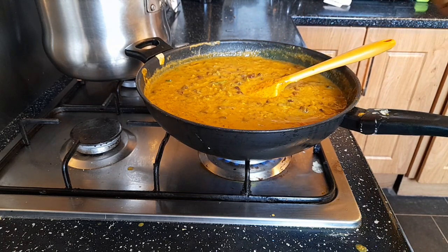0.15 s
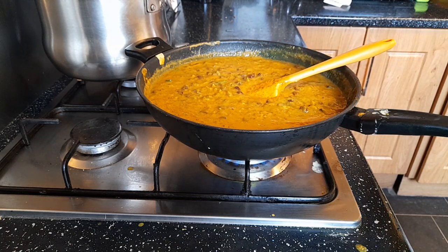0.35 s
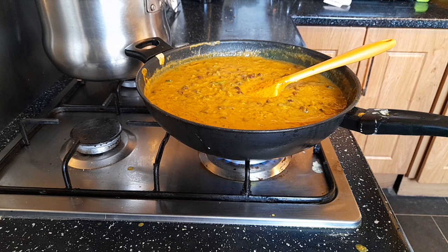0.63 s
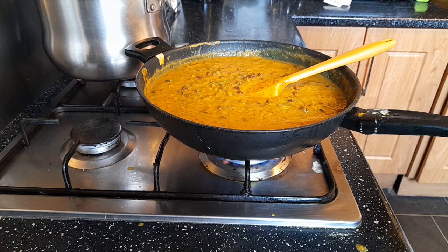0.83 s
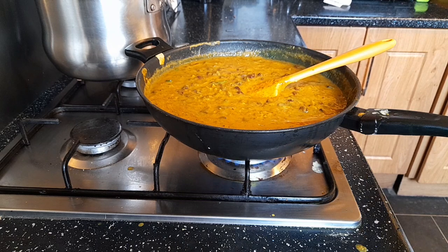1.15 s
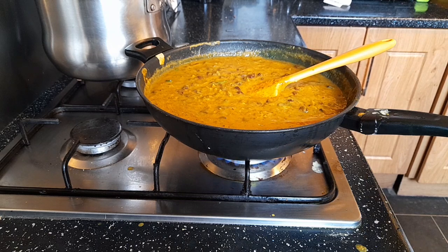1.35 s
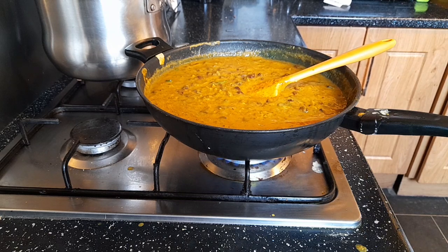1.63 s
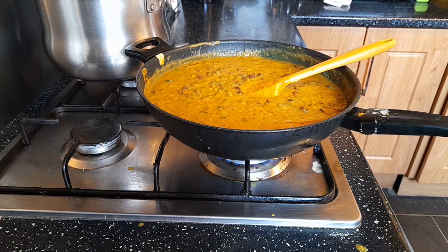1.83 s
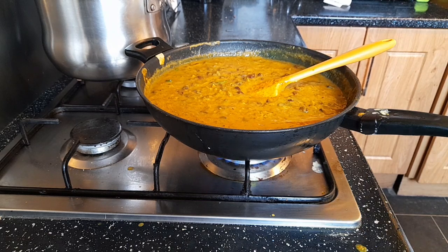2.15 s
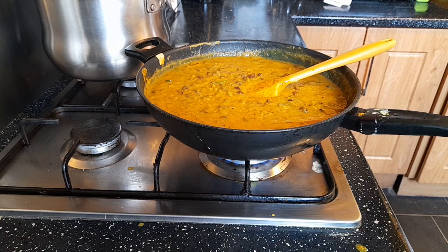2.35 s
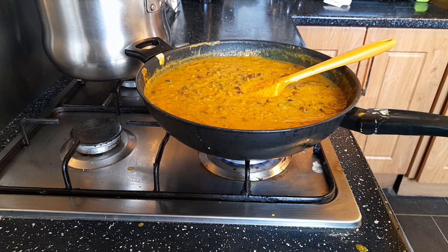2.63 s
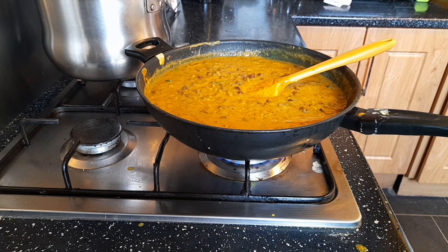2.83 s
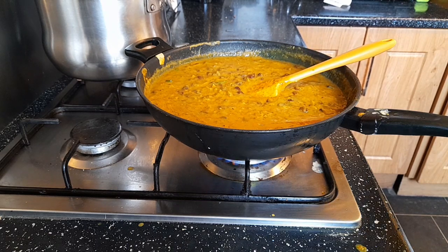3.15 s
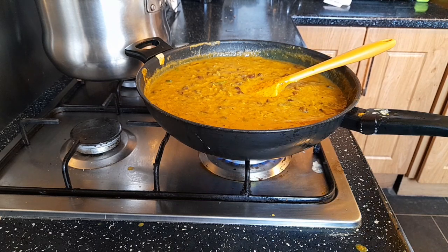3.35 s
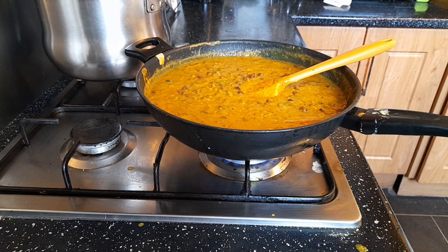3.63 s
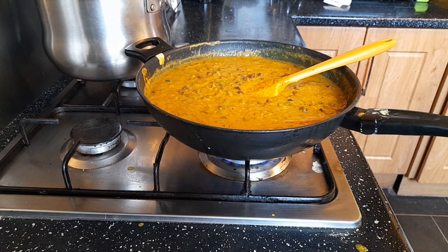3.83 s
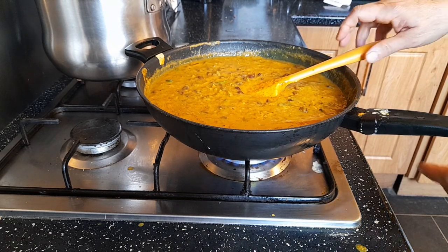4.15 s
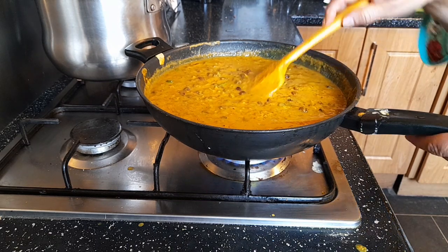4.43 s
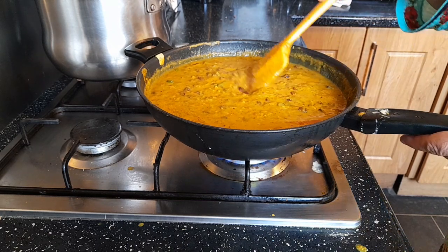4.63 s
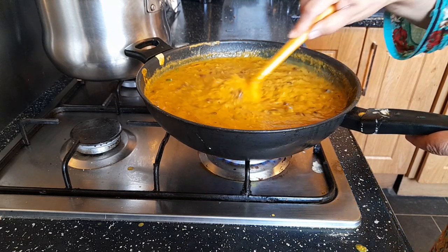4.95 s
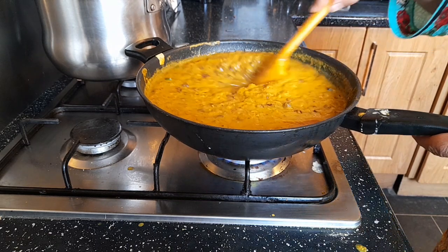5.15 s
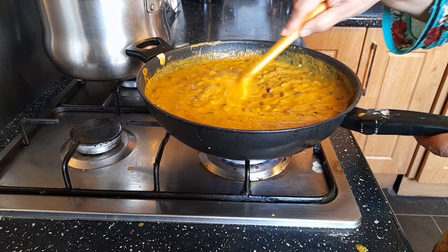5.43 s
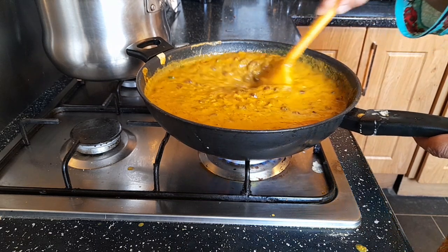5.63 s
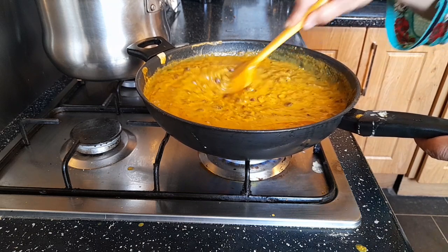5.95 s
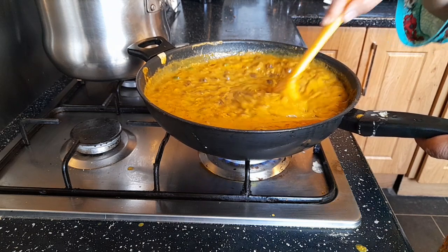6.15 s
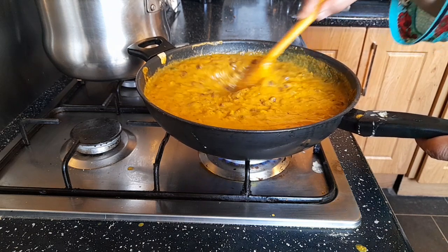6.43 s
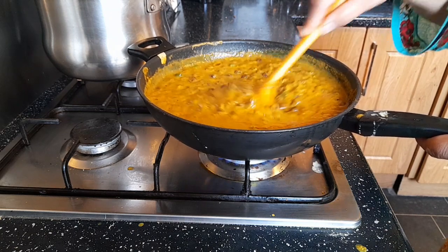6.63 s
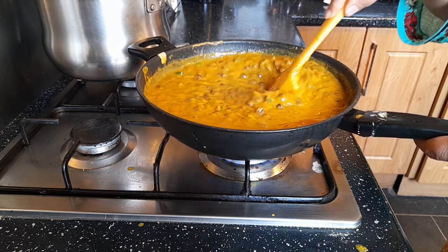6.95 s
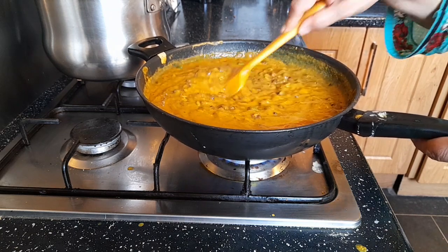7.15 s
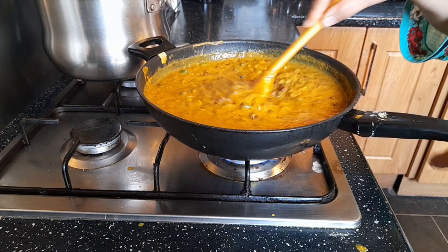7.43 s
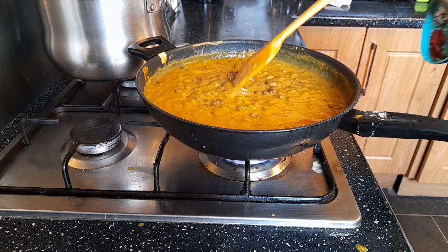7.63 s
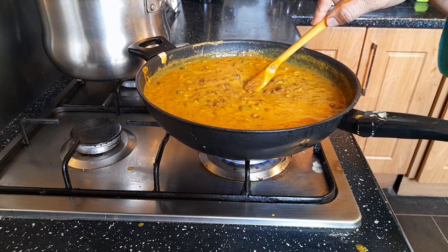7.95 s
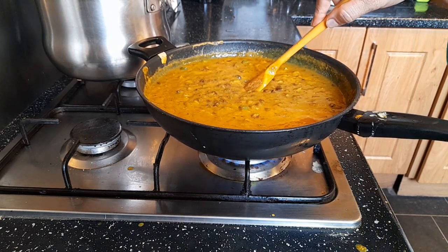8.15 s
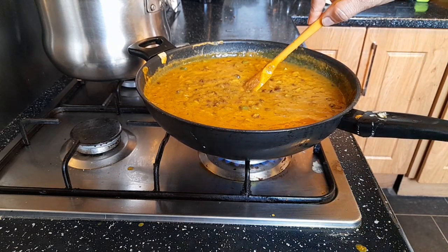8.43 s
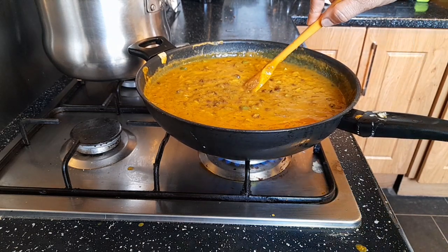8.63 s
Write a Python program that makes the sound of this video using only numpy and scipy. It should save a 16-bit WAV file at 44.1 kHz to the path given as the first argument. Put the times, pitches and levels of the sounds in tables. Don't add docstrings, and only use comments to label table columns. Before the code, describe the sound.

Close stereo pickup in a small, hard-walled kitchen: faint airy gas hiss, uneven flame rumble and small crackling bubble pops from simmering paste. A sudden very loud metallic clatter follows about a third of the way through, several rapid bounces with a knock underneath and a short ring. The background dips afterwards and gradually returns, with somewhat busier soft pops and low plops to the end as the paste is stirred.

```python
import sys
import numpy as np
from scipy import signal
from scipy.fft import rfft, irfft
from scipy.io import wavfile
from scipy.ndimage import uniform_filter1d

SR = 44100
rng = np.random.default_rng(int(sys.argv[2]) if len(sys.argv) > 2 else 0)


def level_to_linear(level):
    exponent = np.asarray(level, float) / 20
    return 10 ** exponent


def transcribe(u):
    v = np.clip(np.atleast_2d(u).T, -1, 1)
    q = np.round(v * 32767).astype(np.int16)
    wavfile.write(sys.argv[1], SR, q)


N = 387638
HALVES = np.array([[.5], [-.5]])

# (t/s, peak level/dB, brightness/dB, left-right/dB)
SITTING_BURSTS = [(0.138, -60, -1, 0), (0.237, -60, 6, -2), (0.342, -60, 5, -1), (0.75, -60, 4, .5),
                  (0.905, -53.5, 2, 1.5), (1.26, -58, -2, .5), (1.3, -50.5, -5, 1), (1.405, -61, 8, -.5),
                  (1.541, -55.5, -2, -.5), (1.743, -53, -3, -1), (1.875, -53, -7, -2.5),
                  (2.073, -63.5, 10, -9), (2.15, -47, -2.5, -6), (2.307, -53, 1, 0), (2.615, -46.5, -11, 5),
                  (3.173, -62, -2, -.5), (3.531, -58, 8.5, -7), (3.948, -50, -10, 5), (4.128, -58, 2, -1.5)]
# (t/s, peak level/dB, brightness/dB, left-right/dB)
STIRRED_BURSTS = [(4.309, -50.5, 1, .5), (4.417, -49, -8, .5), (4.54, -54.5, -4, 4), (4.673, -53.5, -6, -1),
                  (5.146, -58, 6.5, -3), (5.422, -55, 2, .5), (5.6, -60, -3, 0), (5.74, -50, -8, .5),
                  (5.959, -59, -3, -2), (6.273, -59, -3, 0), (6.323, -60, 4, 0), (6.487, -52.5, 3.7, .5),
                  (6.727, -59, -1, -2), (6.781, -54.5, 11, -.5), (6.956, -57, -1, 1), (7.274, -68, 10.5, 4),
                  (7.404, -46.5, -12, -3), (7.427, -47.5, 1, -1), (7.676, -51.5, .1, -8),
                  (7.821, -55, -5, -.5), (7.967, -51, -1.5, 2), (8.142, -54, 6, .5), (8.239, -58, 2, -1),
                  (8.463, -63, .1, 2), (8.495, -53.5, .5, 7)]


def film_bursts():
    out, t = np.zeros((2, N)), np.arange(3000) / SR
    bursts = SITTING_BURSTS + STIRRED_BURSTS
    droplet_draws = rng.random((len(bursts), 2, len(t)))
    snap_t = t[:90]
    dull = np.sin(2 * np.pi * 2300 * snap_t) * np.exp(-snap_t / 0.00016)
    bright = np.sin(2 * np.pi * 4200 * snap_t) * np.exp(-snap_t / 0.00029)
    for (s, db, bright_db, pan_db), (chance, sign) in zip(bursts, droplet_draws):
        spatter_s = max(.012 - .0004 * bright_db, .001)
        drops = (chance < .07) * (sign - .5) * 2.02 * np.exp(-t / spatter_s)
        drops[0] = 1.3
        snap = 0.69 * dull + level_to_linear(bright_db) * bright
        burst = np.convolve(drops, snap)[:len(t)]
        add(out, s, level_to_linear(db + 4.5) * burst * panned(pan_db))
    return out


# (t/s, peak level/dB, f/Hz, T60/s)
CAVITIES = [(0.03, -53, 340, 0.06), (0.27, -54, 320, 0.05), (0.379, -58, 740, 0.046),
            (0.698, -57, 696, 0.05), (1.829, -56, 650, 0.072), (1.935, -55, 706, 0.045),
            (2.151, -59, 554, 0.05), (2.295, -53, 659, 0.045), (2.339, -59, 630, 0.05),
            (3.251, -53, 400, 0.05), (3.383, -40, 370, 0.041), (3.443, -41, 385, 0.05),
            (3.505, -46, 520, 0.035), (4.308, -54, 745, 0.05), (5.084, -60, 660, 0.061),
            (5.719, -55, 316, 0.039), (5.917, -53, 380, 0.05), (6.139, -55.5, 366, 0.06),
            (6.486, -44, 520, 0.02), (6.495, -50, 760, 0.04), (6.968, -51, 600, 0.028),
            (6.975, -50, 240, 0.05), (7.03, -52, 370, 0.044), (7.193, -63, 991, 0.05),
            (7.312, -54, 708, 0.046), (7.416, -52.5, 670, 0.045), (7.675, -53, 746, 0.055),
            (8.298, -56, 657, 0.05)]


def cavity_tones():
    out, t = np.zeros((2, N)), np.arange(5000) / SR
    slap = 1.3 * np.sin(2 * np.pi * 600 * t) * np.exp(-t / .0015)
    onset = np.minimum(t / 0.0014, 1)
    for s, db, hz, t60 in CAVITIES:
        tone = np.sin(2 * np.pi * hz * t * (1 + 4 * t)) * level_to_linear(-60 * t / t60)
        add(out, s, level_to_linear(db - 2.0) * np.tile((tone + slap) * onset, (2, 1)))
    return out


# (f/Hz, level/dB, T60/s, left-right/dB)
SPOON_MODES = [(2267, -17.5, 0.32, -9), (2415, -21.5, 0.25, 3), (2600, -21, 0.2, -4),
               (3252, -16.5, 0.25, -3), (3300, -9, 0.23, -5), (3354, -14.5, 0.3, -6), (3683, -17, 0.2, -3),
               (3915, -5, 0.33, -4), (4246, -8, 0.25, -9), (4321, -0.5, 0.19, -11), (4375, -13, 0.2, -6),
               (5229, -16, 0.25, -4), (5346, -5, 0.24, -11), (5425, -1, 0.25, -1), (5846, -17, 0.25, -5),
               (6002, -21, 0.25, 4), (6617, -14, 0.25, -3), (7515, -20, 0.25, 4), (7744, -24, 0.25, 1),
               (8602, -21, 0.25, 0), (9088, -23, 0.25, 11), (9437, -16, 0.25, -1), (9667, -20, 0.2, -6),
               (9956, -16, 0.25, -1), (10002, -18, 0.25, 0), (11142, -11, 0.15, 11), (12898, -19, 0.25, 4),
               (13121, -4, 0.18, -2), (13646, -17, 0.25, 9), (15148, -22, 0.25, 5)]


def spoon_ring(t, spot, tilt_db, side_db):
    hz, db, t60, mode_side_db = np.transpose(SPOON_MODES)[:, :, None]
    mix, phase, detune = spot
    gain_db = db + tilt_db * np.log2(hz / 4500) + 5 * (mix - .5) + HALVES[:, :, None] * mode_side_db
    decay_db = -60 * t / np.clip(0.96 * t60, .02, .34)
    turns = hz * (1 + 0.0027 * (detune[0] - .5)) * t + phase
    ring = (level_to_linear(gain_db + decay_db) * np.sin(2 * np.pi * turns)).sum(1)
    contact = level_to_linear(3.0 + panned_db(-6.1)) * np.exp(-t / 0.0069)
    return ring * (.5 + contact)


# (f/Hz, level per Hz/dB)
SCRAPE_SPECTRUM = [(1700, -39), (2400, -13), (3000, -26), (4300, -17), (4850, -24), (5450, -8), (7100, -24),
                   (8200, -42), (9700, -9), (11300, -27), (12200, -38), (13000, -13), (14200, -34),
                   (15000, -10)]


def spoon_rattle(t, noise):
    decay = level_to_linear(-11) * np.exp(-t / 0.003) + level_to_linear(-5.0) * np.exp(-t / 0.03)
    return tinted(noise, SCRAPE_SPECTRUM) * decay


# (f/Hz, level per Hz/dB)
WORKTOP_SPECTRUM = [(41, -36.5), (70, -12), (105, 3), (152, -17), (218, -1.5), (300, -16), (400, -4),
                    (520, -9), (659, -10), (971, -18), (1340, -7.5), (1700, -47.5), (2210, -63.5),
                    (3740, -120)]


def worktop_thud(t, noise):
    thud = tinted(noise[0] + 0.15 * noise, WORKTOP_SPECTRUM)
    return level_to_linear(-15.5) * thud * np.exp(-t / 0.019) * np.minimum(t / 0.0022, 1)


# (t/s, blow level/dB, brightness per octave/dB, left-right/dB)
SPOON_BLOWS = [
    (3.3236, -6, 2, -2),
    (3.3365, -8, -1.5, -3.5),
    (3.3555, -13, 2.5, 2),
    (3.3635, -13.5, -8.5, 1.5),
    (3.378, -14.5, -5, -3.5),
    (3.4365, -22, -3, 3),
    (3.4999, -34, -14, 5.2),
]


def clatter():
    out, t = np.zeros((2, N)), np.arange(12000) / SR
    spots = rng.random((len(SPOON_BLOWS), 3, 2, len(SPOON_MODES), 1))
    grit = rng.standard_normal((len(SPOON_BLOWS), 2, len(t)))
    rest_s, rest_db = 3.387, -6
    onset = np.minimum(t / 0.0004, 1)
    for (s, blow_db, tilt_db, pan_db), spot, noise in zip(SPOON_BLOWS, spots, grit):
        spoon = spoon_ring(t, spot, tilt_db, pan_db) + spoon_rattle(t, noise)
        damped = level_to_linear(rest_db * np.clip((s + t - rest_s) / .006, 0, 1))
        struck = spoon * damped * panned(pan_db)
        add(out, s, level_to_linear(blow_db - 12.5) * (struck * onset + worktop_thud(t, noise)))
    return out


# (f/Hz, width/Hz, left level/dB, right level/dB)
JET_MODES = [(3500, 530, -5.5, -6.5), (4300, 400, -0.5, 0), (5295, 200, 5.5, 3), (5680, 310, -5.5, -8.5),
             (6090, 220, -9, -9), (6600, 230, -4.5, -16), (7062, 206, 6.5, 7.5), (7390, 620, -0.5, -2),
             (7730, 200, -12, 1), (7620, 250, -10, -5), (8400, 200, -22, -10), (8910, 250, 1.5, -1.5),
             (9400, 970, -0.5, -8), (10220, 560, 8.5, -1.5), (11200, 250, -7.5, 0), (11670, 270, 13, 2),
             (12170, 650, 11, 5), (12630, 200, 16, 4.5), (13050, 390, 11, 4), (13550, 300, 8, 0.5),
             (14250, 1500, 5.5, 2), (15400, 600, -4, 4.5)]
# (f/Hz, level/dB)
JET_BED_SPECTRUM = [(1500, -13), (2200, -23.5), (3000, -15.5), (5000, -7), (6400, -19), (8200, -12),
                    (11000, -11.5), (15000, -20.5)]
# (t/s, left-right level of the jet/dB)
JET_TURN = [
    (0, -1),
    (7.75, -0.4),
    (8.27, -2),
    (8.79, -4),
]


def gas_jet():
    def colour(hz):
        return np.hypot(humps(JET_MODES, hz, 1.9), level_to_linear(read(JET_BED_SPECTRUM, hz)))

    hiss = airy(colour, size=2048, patchy_db=1.9, flicker_db=0.6)
    turn_db = np.interp(np.arange(N) / SR, *np.transpose(JET_TURN))
    return level_to_linear(-48.6 - 3.6 * held_down()) * hiss * panned(turn_db)


# (f/Hz, width/Hz, left level/dB, right level/dB)
SIMMER_MODES = [(670, 190, -3, -2.5), (943, 460, -1.5, -3), (1330, 220, 1.5, 4), (1457, 200, -3, 3),
                (1690, 150, -6.5, -18.5)]


def simmer_roar():
    roar = airy(lambda hz: humps(SIMMER_MODES, hz, 1.68), size=2048, patchy_db=1.3, flicker_db=1.1)
    return level_to_linear(-60.4 - 4.2 * held_down()) * roar


# (f/Hz, width/Hz, left level/dB, right level/dB)
RUMBLE_MODES = [(66, 19, -4, -4), (101.1, 11, 2, -1), (117.6, 16, 0.5, 0.5), (185, 82, -9, -12),
                (221.2, 25, -1, -6), (262, 57, -17, -9.5), (368, 68, -19, -14)]


def flame_rumble():
    deep = airy(lambda hz: humps(RUMBLE_MODES[:3], hz, 1.3), size=4096, patchy_db=-0.75, flicker_db=1.2)
    upper = airy(lambda hz: humps(RUMBLE_MODES[3:], hz, 1.66), size=2048, patchy_db=1.7, flicker_db=-0.5)
    boom = signal.sosfiltfilt(signal.butter(4, 290, fs=SR, output="sos"), upper)
    steady = level_to_linear(-65.5) * (upper - boom)
    deep_gain, upper_gain = flare_gains()
    return level_to_linear(-0.5 - 4.5 * held_down()) * (deep_gain * deep + upper_gain * boom + steady)


# (middle t/s, level/dB, length/s, upper over deep rumble/dB)
DRAUGHTS = [(0.15, -61, .3, -2), (0.56, -58, .2, 0), (0.74, -60, .16, -3), (1.1, -57, .26, -8),
            (1.42, -59, .24, -4), (1.68, -54, .2, -8), (1.9, -59, .1, -3), (2.24, -56, .26, -9),
            (2.45, -59, .26, -4), (2.82, -53, .3, -8), (3.02, -58.5, .12, -5), (3.19, -56, .14, -8),
            (4.47, -56, .22, -7), (4.72, -56, .2, -3), (4.92, -61, .14, 7.5), (5.16, -56, .16, -7),
            (5.39, -64, .2, 6), (5.65, -57, .26, -7), (5.87, -63, .16, 7), (6.04, -55.5, .18, -7),
            (6.24, -59, .12, 1), (6.38, -57, .12, -11), (6.64, -59, .16, 2), (6.92, -55.5, .4, -5),
            (7.57, -57, .24, -6), (7.84, -60, .2, -2), (8.05, -58, .3, -5), (8.26, -57, .22, -8),
            (8.58, -59, .18, -5), (8.78, -61, .14, -5)]


def flare_gains():
    calm_db = -65
    t = np.arange(0, N / SR + .01, .005)
    s, db, length, upper_db = np.transpose(DRAUGHTS)[:, :, None]
    swell = level_to_linear(2 * db) * np.exp(-(2.4 * (t - s) / length) ** 2)
    deep = swell.sum(0) + level_to_linear(2 * calm_db)
    upper = (swell * level_to_linear(2 * upper_db)).sum(0) + level_to_linear(2 * (calm_db - 2.5))
    return [np.interp(np.arange(N) / SR, t, np.sqrt(power)) for power in (deep, upper)]


def held_down():
    drop_s, hold_s, release_s, creep = .15, 1.28, .26, .3
    t = np.arange(N) / SR - SPOON_BLOWS[0][0]
    drop = np.clip(t / drop_s, 0, 1)
    creeping = 1 - creep * np.clip(t / hold_s, 0, 1)
    release = np.clip(1 - (t - hold_s) / release_s, 0, 1)
    return drop * creeping * release


# (f/Hz, coherence 0-1)
COHERENCE = [(60, .96), (160, .92), (300, .7), (700, .55), (1100, .3), (3000, .2), (7000, .35), (15000, .3)]
# (f/Hz, phase/rad)
PHASE_LEAD = [(60, 0), (300, .05), (800, .5), (1500, 2.2), (5000, .3), (9000, 1.6), (15000, 1.2)]


def airy(colour, size, patchy_db, flicker_db):
    frames, hz = 4 * N // size + 5, np.fft.rfftfreq(size, 1 / SR)
    a, b, c, d, patches = rng.standard_normal((frames, len(hz), 5)).T
    patches = uniform_filter1d(uniform_filter1d(patches, size=9, axis=0), size=7, axis=1)
    flicker = evened(uniform_filter1d(rng.standard_normal(frames), size=3))
    drift = level_to_linear(patchy_db * evened(patches) + flicker_db * flicker)
    ripple = level_to_linear(2.9 * rng.standard_normal((len(hz), 2)).T * np.minimum(hz / 700, 1))
    same = np.clip(read(COHERENCE, hz), 0, 1)[:, None]
    lag = np.exp(-1j * read(PHASE_LEAD, hz))[:, None]
    left = a + 1j * b
    right = same * left * lag + np.sqrt(1 - same ** 2) * (c + 1j * d)
    z = np.array([left, right]) * (ripple * colour(hz))[:, :, None] * drift
    return evened(signal.istft(z, nperseg=size, noverlap=3 * size // 4)[1][:, :N])


# (f/Hz, T60/s)
KITCHEN_DECAY = [(200, 0.38), (600, 0.14), (1500, 0.62), (4000, 0.32), (10000, 0.36), (15000, .24)]


def kitchen(x):
    length, spacing = SR // 2, 20
    taps = np.zeros((2, length))
    slots = np.arange(160, length - spacing, spacing)
    at = slots + rng.integers(0, spacing, (2, len(slots)))
    np.put_along_axis(taps, at, rng.choice([-1., 1.], at.shape), 1)
    hz, t, z = signal.stft(taps, SR, nperseg=256)
    same = read(COHERENCE, hz)[:, None]
    z = same * z[0] + np.sqrt(1 - same ** 2) * z * [[[.3]], [[1]]]
    z = z / np.sqrt(np.mean(abs(z) ** 2, axis=2, keepdims=True))
    decay = level_to_linear(-60 * t / read(KITCHEN_DECAY, hz)[:, None])
    tail = signal.istft(z * decay, SR, nperseg=256)[1]
    return signal.fftconvolve(x.mean(0)[None], tail / np.linalg.norm(tail[0]), axes=1)[:, :N]


def humps(modes, hz, steep):
    f, width, left_db, right_db = np.transpose(modes)[:, :, None]
    shape = (1 + (2 * (hz - f) / width) ** 2) ** -steep
    return np.sqrt([(level_to_linear(2 * db) * shape).sum(0) for db in (left_db, right_db)])


def tinted(noise, points):
    size = noise.shape[-1]
    colour = level_to_linear(read(points, np.fft.rfftfreq(size, 1 / SR)))
    return evened(irfft(rfft(noise) * colour, size))


def read(points, hz):
    f, value = np.transpose(points)
    return np.interp(np.log(hz + 1), np.log(f + 1), value)


def evened(x):
    return x / np.sqrt(np.mean(x ** 2) + 1e-20)


def panned_db(db):
    return HALVES * db


def panned(db):
    return level_to_linear(panned_db(db))


def add(mix, s, sound):
    part = mix[:, round(s * SR):][:, :sound.shape[1]]
    part += sound[:, :part.shape[1]]


def scene():
    bubbles, spoon = film_bursts() + cavity_tones(), clatter()
    burner = gas_jet() + simmer_roar() + flame_rumble()
    return burner + bubbles + spoon + kitchen(level_to_linear(1.5) * bubbles + level_to_linear(-5) * spoon)


def top_cut(x):
    return signal.sosfilt(signal.butter(12, 15830, fs=SR, output="sos"), x)


def record(dry):
    heard = signal.sosfilt(signal.butter(2, 48, "high", fs=SR, output="sos"), dry)
    return top_cut(0.99 * np.tanh(heard / 0.95))


dry = scene()
out = record(dry)
transcribe(out)
```